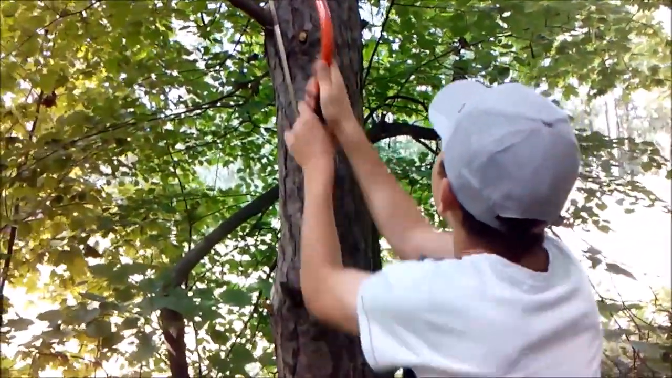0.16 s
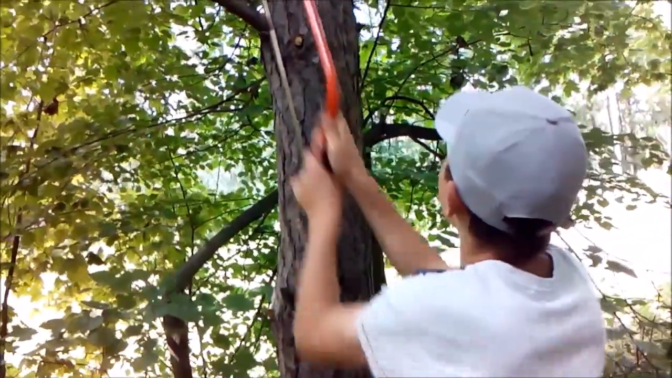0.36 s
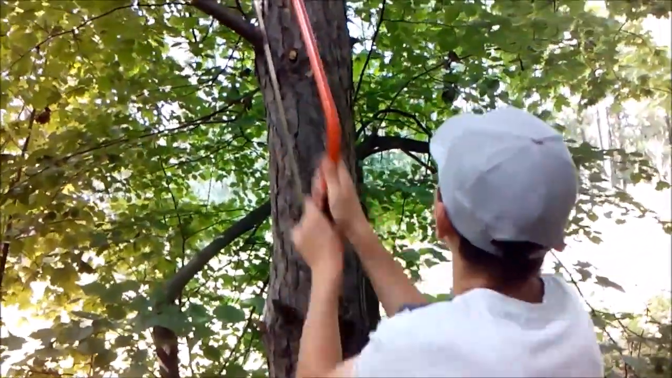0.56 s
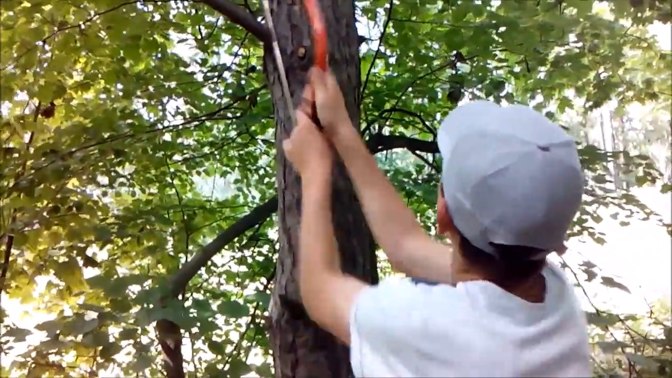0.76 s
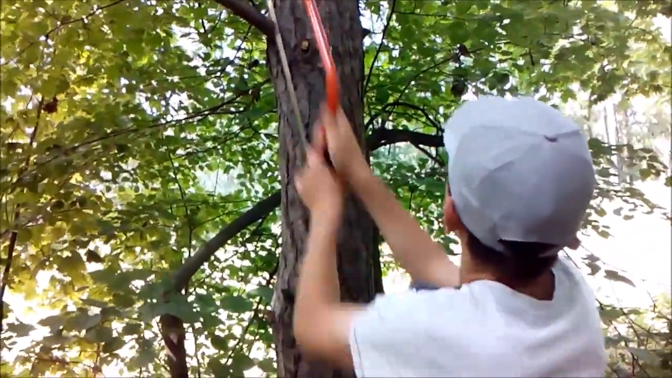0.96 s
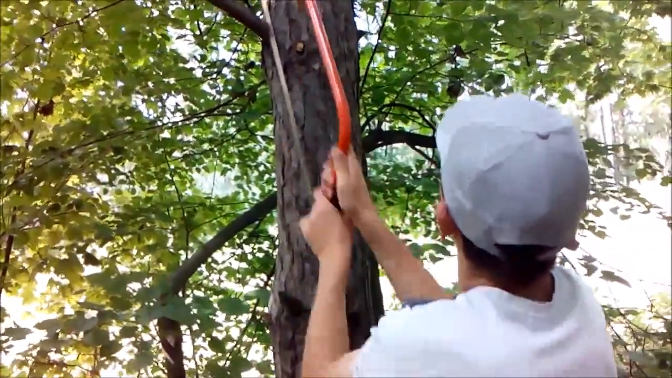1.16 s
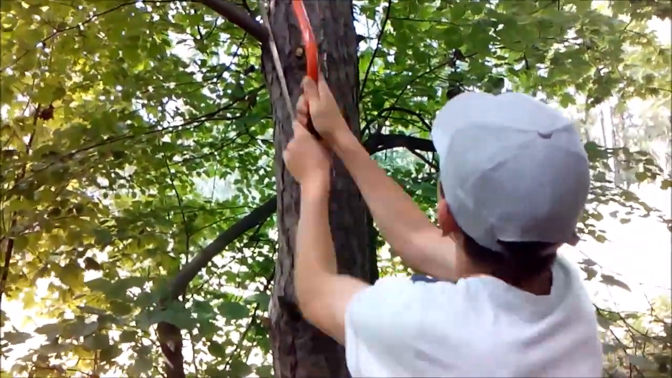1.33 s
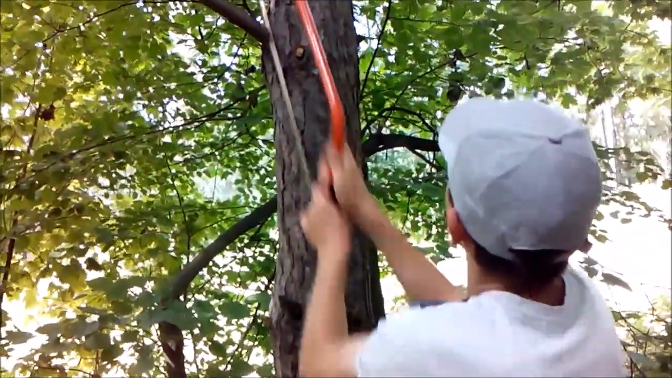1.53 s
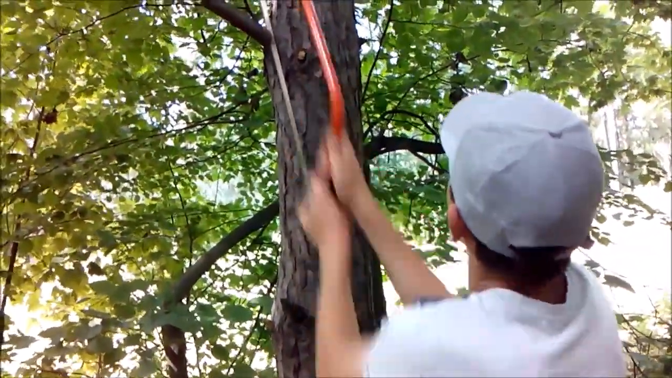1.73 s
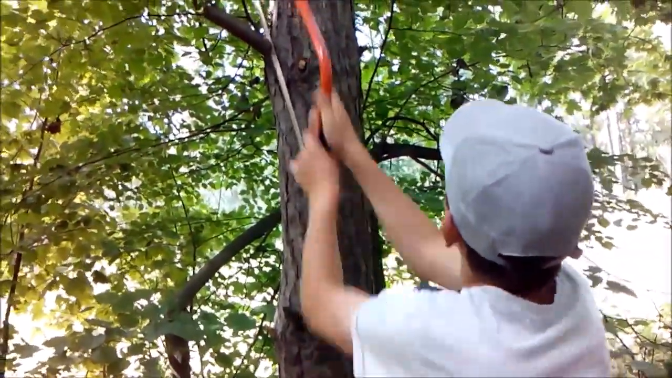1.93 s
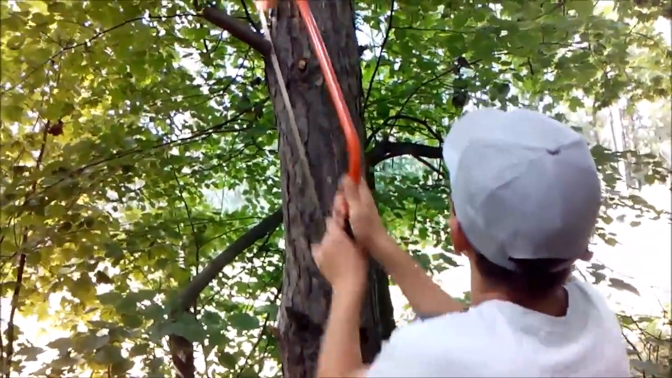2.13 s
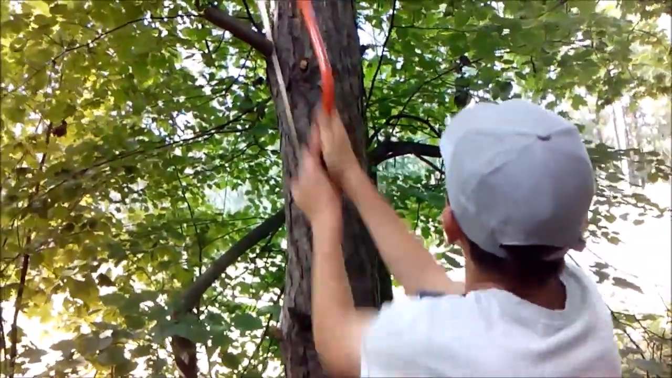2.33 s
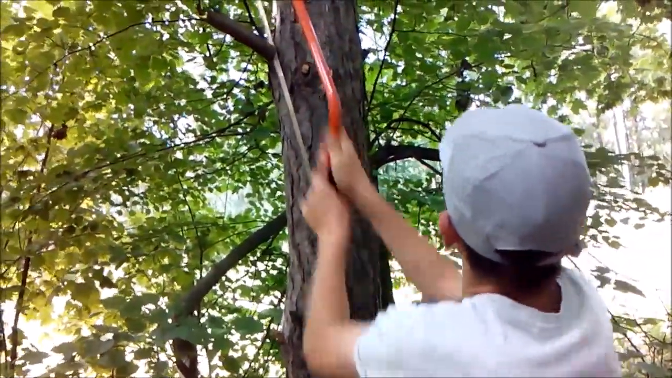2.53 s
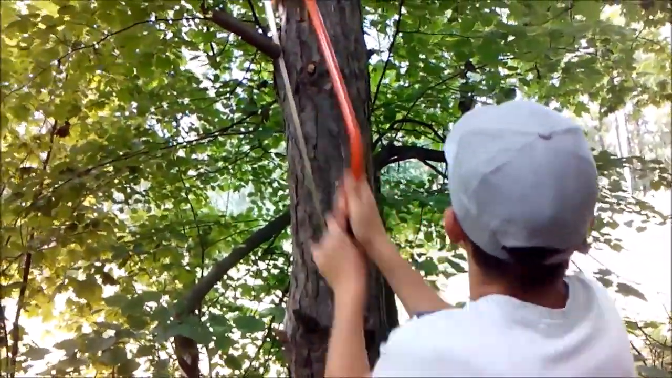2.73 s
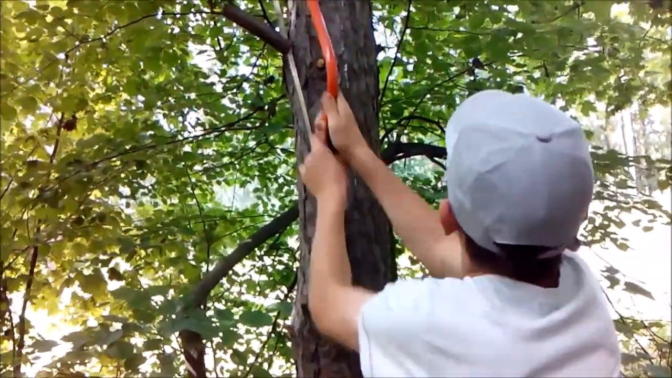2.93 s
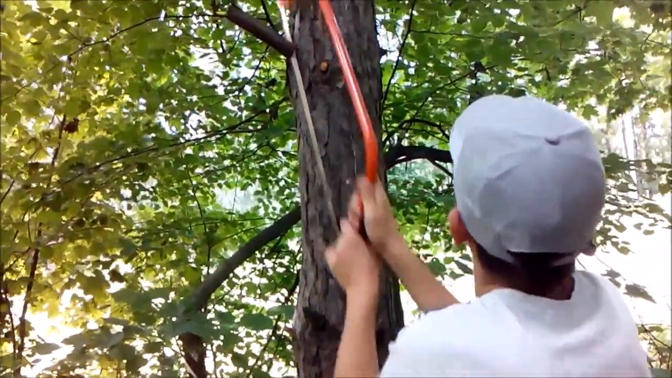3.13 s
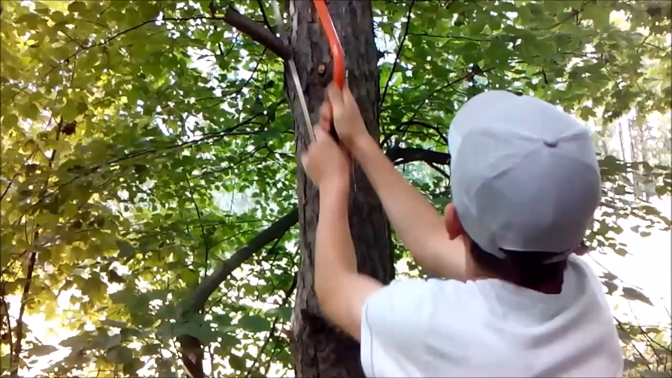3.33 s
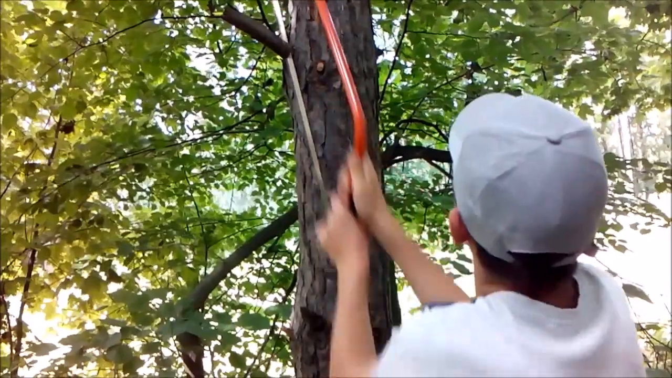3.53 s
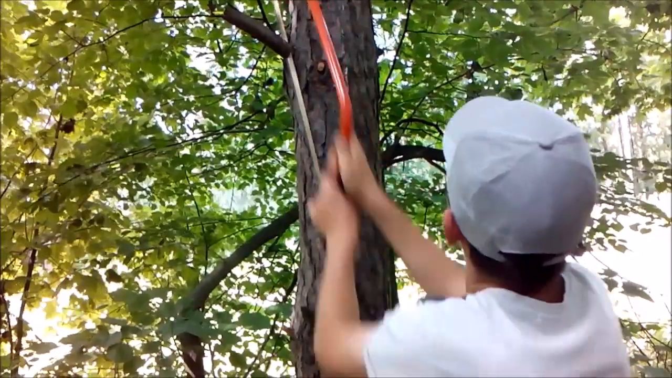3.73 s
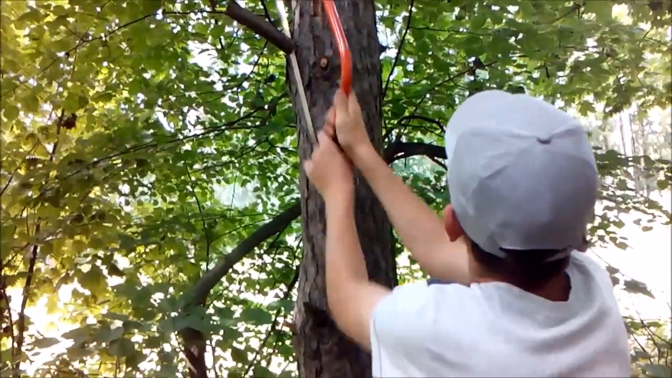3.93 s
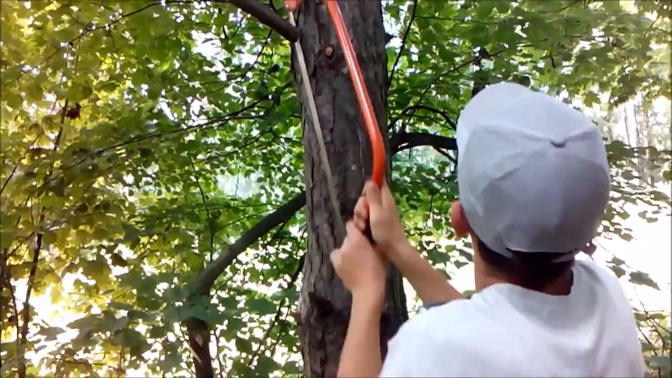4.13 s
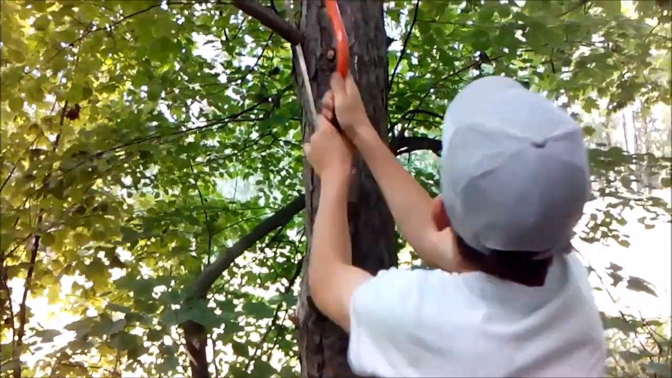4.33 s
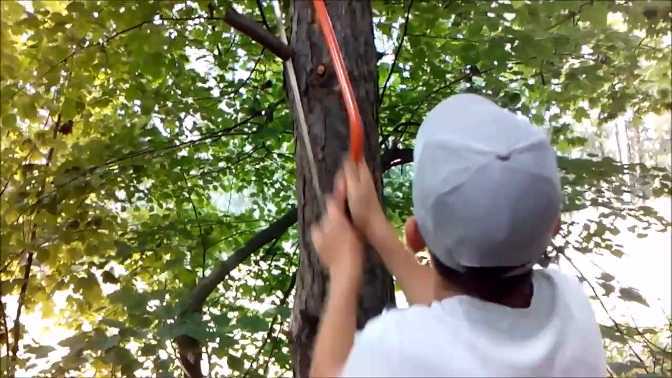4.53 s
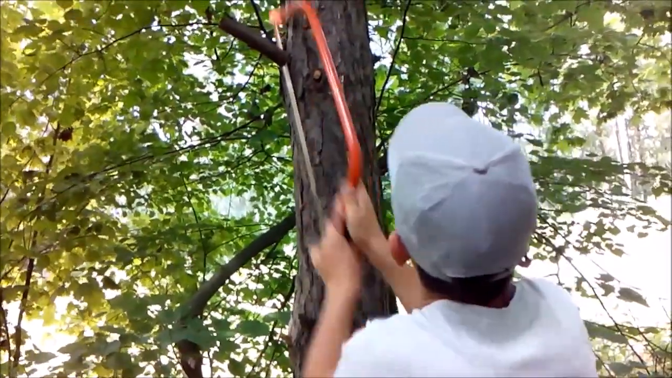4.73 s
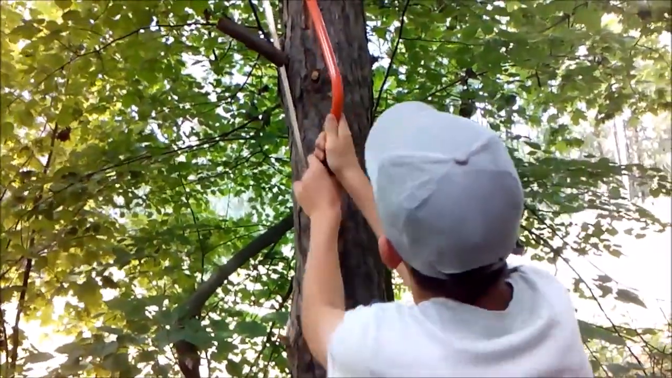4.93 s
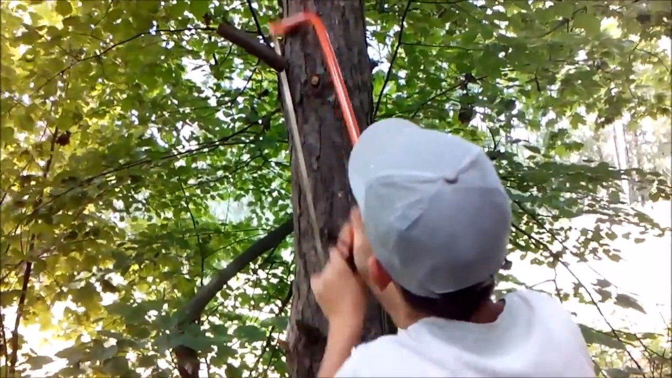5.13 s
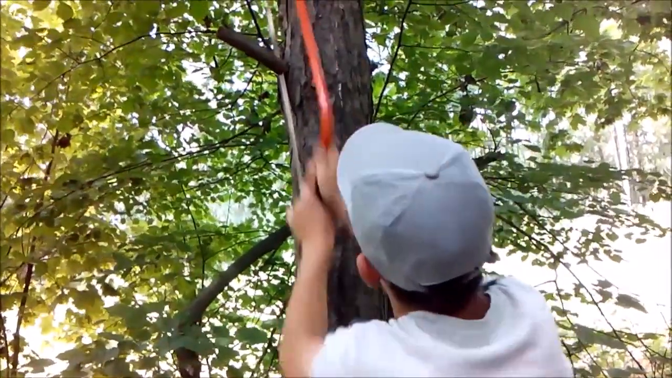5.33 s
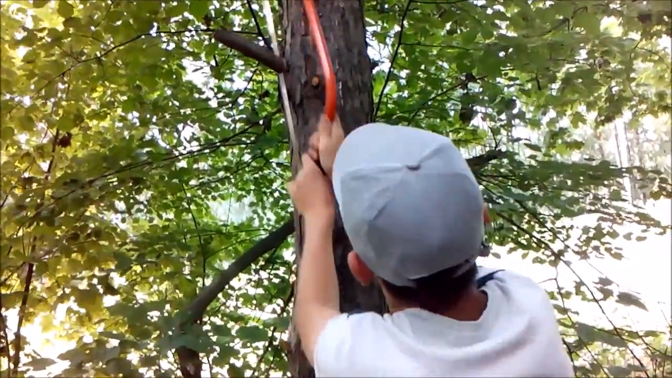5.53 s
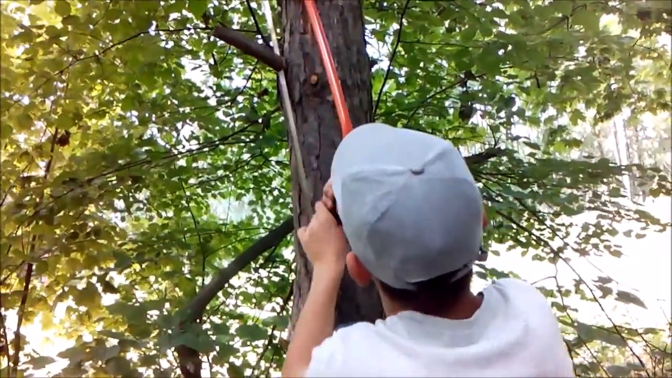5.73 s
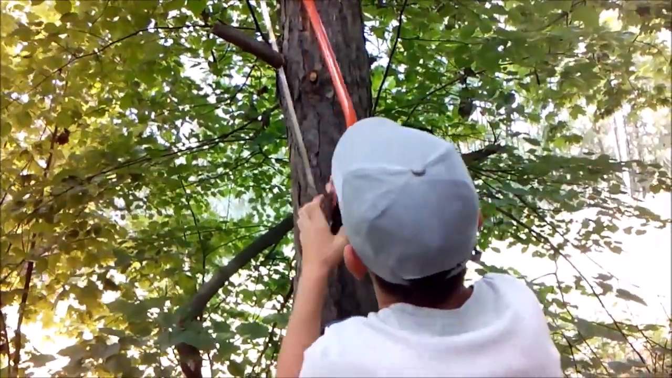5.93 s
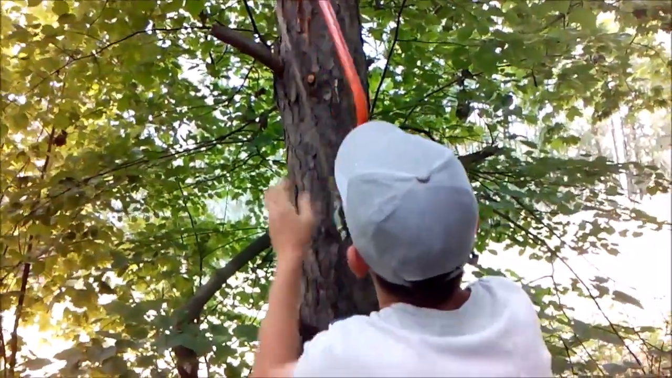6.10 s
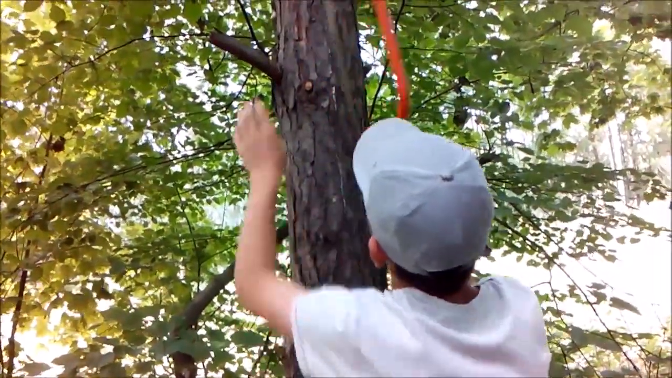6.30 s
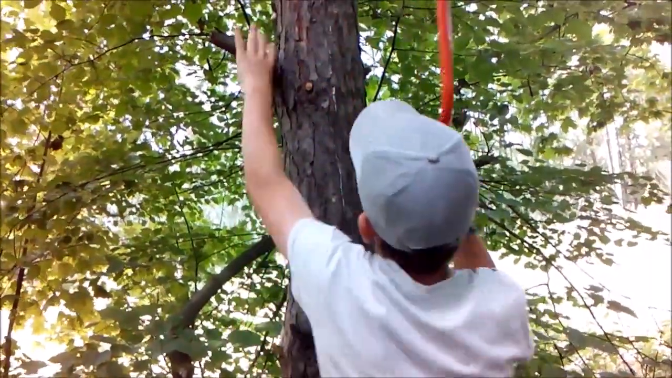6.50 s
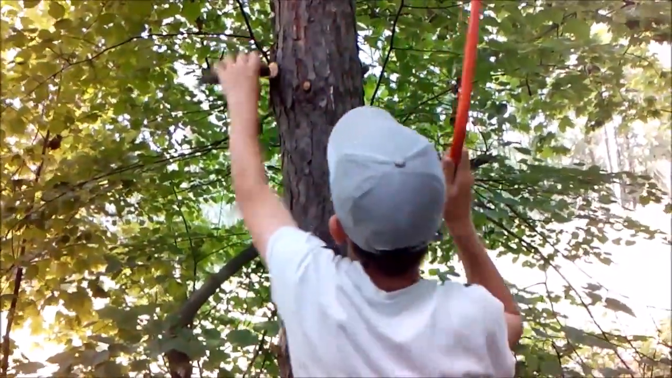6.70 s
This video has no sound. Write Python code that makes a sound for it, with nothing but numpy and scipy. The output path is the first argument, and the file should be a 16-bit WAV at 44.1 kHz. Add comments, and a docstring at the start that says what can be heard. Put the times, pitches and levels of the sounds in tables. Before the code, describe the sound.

Rapid raspy sawing, bright steel teeth tearing dry fibres, with louder pulls and lighter pushes. Teeth catch and burst free; the stub hums and groans low. The pace eases to long, separate, hollow strokes with very faint return pushes, then the saw comes away and a hand brushes bark with crisp scuffs and little knocks. Heard close, in open woodland with faint scattered echoes and a very quiet leafy background.

```python
"""In a quiet wood, over a steady hiss of leaves and a rumble, a bow saw cuts a dry branch stub off a tree.
Quick strokes slow and lighten: noisy tooth strikes excite the resonances of steel, fibres and hollow wood.
The stub drones on the pull, caught teeth burst free, the pinched blade sings, and the sagging stub groans.
Dry ticks join during the cut; then the saw is lifted away, and bark and twigs, grains of noise, rustle
and tick under a hand. Scattered echoes from ground and trees follow every near sound."""
import sys
import numpy as np
from scipy import signal
from scipy.fft import rfft, irfft
from scipy.io import wavfile
from scipy.ndimage import uniform_filter1d

SR = 44100
rng = np.random.default_rng(int(sys.argv[2]) if len(sys.argv) > 2 else 0)


def wav_record(signal):
    """Record a signal, one row per channel, as 16-bit PCM in the file named by sys.argv[1]."""
    frames = np.transpose(np.atleast_2d(signal))
    bounded = np.clip(frames, -1, 1)
    # unit amplitude maps onto the largest positive 16-bit level
    quanta = np.round(bounded * 32767).astype(np.int16)
    wavfile.write(sys.argv[1], SR, quanta)


N = 302512
TIME = np.arange(N) / SR  # s


def gain_of(db):
    """Level law: decibels to amplitude ratio."""
    return 10 ** (np.asarray(db) / 20)


def evened(x):
    """Normalisation: scales to rms 1."""
    return x / np.sqrt(np.mean(x ** 2) + 1e-20)


def add(mix, s, sound):
    """Superposition: adds a sound to the mix from time s in seconds."""
    part = mix[round(s * SR):][:len(sound)]
    part += sound[:len(part)]


def curve(points):
    """Linear interpolation over time through (seconds, value) points."""
    return np.interp(TIME, *np.transpose(points))


def coloured(x, points):
    """Spectral shaping: filters by (Hz, dB) points joined along log frequency."""
    hz, db = np.transpose(points)
    bins_hz = np.fft.rfftfreq(len(x), 1 / SR)
    response_db = np.interp(np.log(bins_hz + 1), np.log(hz), db)
    return irfft(rfft(x) * gain_of(response_db), len(x))


def wander(rate_hz):
    """Low-passed random process: smooth chance of about rms 1, mostly slower than the given rate."""
    coarse = TIME[::32]
    keep = np.exp(-(np.fft.rfftfreq(len(coarse), coarse[1]) / rate_hz) ** 2)
    noise = rng.standard_normal(len(coarse))
    return np.interp(TIME, coarse, evened(irfft(rfft(noise) * keep, len(coarse))))


def resonate(x, hz, width):
    """Resonance: a double pole of peak gain 1 that follows the curve hz, 6 dB down at hz +- width."""
    turn = np.exp(2j * np.pi * np.cumsum(hz * np.ones(len(x))) / SR)
    r = np.exp(-2 * np.pi * width / SR)
    # shift the resonance to 0 Hz, low-pass there and shift back
    slow = signal.lfilter([(1 - r) ** 2], [1, -2 * r, r * r], x / turn + 1e-18)
    return 2 * (turn * slow).real


def ring(x, modes, shift_hz=0, coupling_db=0, drift=0):
    """Modal synthesis: modes shift together, and each swells and drifts as the contact passes its nodes."""
    out = 0
    for hz, width, db in modes:
        level = gain_of(db + coupling_db * np.tanh(wander(12.0)))
        pitch_hz = (hz + shift_hz) * (1 + drift * wander(11.5))
        out = out + level * resonate(x, pitch_hz, width)
    return evened(out)


def dappled(x, depth_db=6.0, size=1024):
    """Dense modal field: narrow bands swell and fade for a few hundredths of a second."""
    overlap = size * 3 // 4
    z = signal.stft(x, nperseg=size, noverlap=overlap)[2]
    field = uniform_filter1d(rng.standard_normal(z.shape), size=2, axis=0)
    field = evened(uniform_filter1d(field, size=7, axis=1))
    shaped = z * gain_of(depth_db * np.minimum(field, 2))
    return evened(signal.istft(shaped, nperseg=size, noverlap=overlap)[1][:N])


# Spectrum of the air in the wood. Each row: frequency in Hz, relative level in dB.
AIR_SPECTRUM = [(20, -23), (50, -13.5), (100, -2.5), (160, -8), (300, -16), (700, -21), (1050, -17),
                (3000, -18.5), (5400, -15.5), (6500, -22.5), (8200, -42), (15000, -41.5)]
AIR_DB = -71.5  # rms


def forest():
    """Stationary shaped noise: a soft hiss of leaves over a distant rumble."""
    return gain_of(AIR_DB + 0.5 * wander(7.5)) * evened(coloured(rng.standard_normal(N), AIR_SPECTRUM))


def trunks(x, t60, wet_db):
    """Diffuse scattering: faint, sparse, decaying echoes from the ground and the trees."""
    t = np.arange(SR // 3) / SR
    sparse = rng.random(len(t)) < 1500 / SR  # 1500 echoes a second
    taps = rng.standard_normal(len(t)) * sparse * (t > .008) * gain_of(-60 * t / t60)
    return x + gain_of(wet_db) * signal.fftconvolve(x, taps / np.linalg.norm(taps))[:N]


# Spectrum of snapping bark and twigs. Each row: frequency in Hz, relative level in dB.
BARK_SPECTRUM = [(40, -51), (120, -29), (240, -4), (550, -13.5), (820, -3), (1200, -9), (1700, -5.5),
                 (3000, -2), (4300, 3), (5500, 6), (6600, -4.5), (7700, -28), (10000, -47)]
# Hand and blade brush over bark and twigs. Each row: middle in seconds,
# length between the 1/e points in seconds, level at the middle in dB.
SCUFFS = [(5.785, 0.061, -75), (6.127, .11, -71), (6.328, 0.092, -52), (6.49, .08, -66.5),
          (6.731, 0.062, -54), (6.84, 0.14, -66)]
# the quiet rustle of moving about as the saw comes free
RUSTLE_FROM_S, RUSTLE_DB = 5.85, -75


def rubbing(grain_db=2.0, patchy_db=2.0):
    """Granular friction: tiny flakes of bark snap in clumps under hand and blade; scuffs swell and fade."""
    sizes = gain_of(grain_db * np.minimum(rng.exponential(1, N), 5))
    grains = rng.standard_normal(N) * sizes * (rng.random(N) < 6000 / SR)  # 6000 a second
    flakes = dappled(coloured(grains, BARK_SPECTRUM), depth_db=3.0)
    flakes = evened(gain_of(patchy_db * wander(90)) * flakes)
    scuffs = sum(gain_of(db) * np.exp(-(2 * (TIME - s) / length) ** 2) for s, length, db in SCUFFS)
    rustle = gain_of(RUSTLE_DB) * np.clip((TIME - RUSTLE_FROM_S) / 0.17, 0, 1)
    return (scuffs + rustle) * flakes


# Dry ticks and knocks of wood and twigs. Each row: start in seconds, peak level in dB, pitch in Hz.
TICKS = [(2.847, -35.5, 3200), (3.187, -43.5, 598), (3.626, -51, 4770), (3.856, -52, 5783),
         (4.899, -60, 5600), (5.761, -58, 5770), (6.467, -48, 5400), (6.591, -52.5, 4760),
         (6.693, -50, 4060), (6.738, -45, 890), (6.82, -49, 5300), (6.8351, -41.5, 4130),
         (6.835, -46.5, 382)]


def ticks(t60=0.0099):
    """Impulsive excitation: a brief crack of dry wood with one strong resonance."""
    out, t, lead = np.zeros(N), np.arange(2048) / SR, 256
    for s, db, hz in TICKS:
        decay = gain_of(-60 * t / t60) + 0.049 * np.exp(-t / 0.0043)
        crack = rng.standard_normal(len(t)) * decay
        tick = np.pad(crack + 3.5 * resonate(crack, hz, 400), lead)
        tick = coloured(tick, BARK_SPECTRUM)
        tick = coloured(tick, [(3 * hz, 0), (9 * hz, -14)])  # low knocks are also duller
        add(out, s - lead / SR, gain_of(db) * tick / abs(tick).max())
    return out


# The sagging stub shudders, mostly as a pull ends, and once during a push.
# Each row: middle in seconds, rms level in dB, pitch at the middle in Hz.
SHUDDERS = [(1.255, -61, 155), (1.347, -67.5, 127), (1.559, -70, 130), (1.838, -67, 141),
            (2.19, -57.5, 273), (2.489, -59.5, 299), (3.17, -65, 147), (4.529, -70, 136.6),
            (5.055, -60.5, 156.4), (5.611, -61.5, 150.4)]


def shudders(length=0.1):
    """Falling resonance: a low, rough groan of wood that drops in pitch as the blade slows."""
    out, u = np.zeros(N), np.linspace(-1, 1, int(length * SR))
    sag = 1 - .15 * u
    for s, db, hz in SHUDDERS:
        groan = resonate(rng.standard_normal(len(u)), hz * sag, 49) * np.cos(np.pi * u / 2)
        add(out, s - length / 2, gain_of(db) * evened(groan))
    return out


# Modes of the blade held in the cut.
# Each row: frequency in Hz, half-width at -6 dB in Hz, relative level in dB.
BLADE_MODES = [(1565, 151, 2), (1887, 117, 2), (2040, 57, -1), (2260, 94, 2), (2492, 112, 3.5),
               (3029, 82, 2.5), (3318, 93, 0.5), (3755, 48, -0.5), (4544, 117, 1), (4804, 60, 1.5),
               (5264, 102, 3), (5515, 96, -0.5), (5910, 110, -0.5), (6410, 91, -12.5)]
# Spectrum of tearing fibres. Each row: frequency in Hz, relative level in dB.
TEAR_SPECTRUM = [(300, -25), (1200, -16), (1550, -0.5), (3300, 6.5), (4000, 3), (5400, 3), (6200, -2),
                 (7000, -11), (7700, -22.5), (8500, -34.5), (13000, -51.5), (16000, -67)]
# A tooth catches and breaks free. Each row: release in seconds,
# starting rms level in dB before a last treble cut, 60 dB decay time in seconds.
SNAGS = [(0.253, -40.5, 0.26), (0.407, -36.5, 0.084), (0.575, -39, 0.044), (0.6688, -39, 0.024),
         (0.704, -40, 0.03), (1.024, -30.5, 0.032), (1.142, -38.5, 0.047), (1.168, -34.5, 0.035),
         (1.6153, -40.5, 0.08), (1.915, -40.5, 0.07), (2.103, -40.5, 0.14), (2.333, -54, 0.031),
         (2.913, -49.5, 0.11), (3.582, -54, 0.04)]
HOLD_S, HOLD_DB = 0.012, -4  # before a snag the caught tooth holds the blade back


def snags():
    """Stick-slip release: a caught tooth lets go with a short, harsh burst in blade and fibres."""
    bursts, t = np.zeros(N), np.arange(SR // 8) / SR
    for s, db, t60 in SNAGS:
        add(bursts, s, gain_of(db - 60 * t / t60))
    jolt = rng.standard_normal(N)
    harsh = evened(ring(jolt, BLADE_MODES) + evened(coloured(jolt, TEAR_SPECTRUM)))
    return coloured(bursts * harsh, [(6500, 0), (8500, -25)])


def held_back():
    """Stick phase: the gain sinks as a tooth catches, and returns when it lets go."""
    db = sum(HOLD_DB * np.exp(-abs(s - TIME) / HOLD_S) * (TIME < s) for s, _, _ in SNAGS)
    return gain_of(uniform_filter1d(db, size=60))


# Cycles of the arm. Each row: pull start in seconds, push start in seconds, nominal pull rasp in dB,
# nominal push rasp in dB, stub drone on the pull in dB re rasp.
CYCLES = [(-0.113, 0.025, -37.5, -42, -9), (0.211, 0.379, -36, -41, -12), (0.519, 0.683, -37, -40.5, -10),
          (0.814, 0.981, -36.5, -39.5, -16), (1.112, 1.274, -37.5, -41, -15),
          (1.406, 1.583, -40, -46, -18.5), (1.721, 1.89, -42, -45, -12), (2.019, 2.213, -42.5, -46.5, -11),
          (2.34, 2.519, -43.5, -47.5, -11.7), (2.666, 2.841, -46, -50.2, -8),
          (2.997, 3.187, -49.5, -55, -13.5), (3.401, 3.59, -46, -55, -6),
          (3.859, 4.068, -44.5, -54.5, -9.5), (4.367, 4.582, -45.5, -56, -26.5),
          (4.875, 5.118, -48, -60.5, -10.4), (5.414, 5.682, -45, -69.5, -9)]
LAST_STROKE_ENDS = 5.915  # s
# share of a stroke gone when the blade is fastest; a slow push takes longer to gather speed
PULL_FASTEST, PUSH_FASTEST, PUSH_LAG_PER_S = .566, .485, .59
PUSH_DRONE_DB = -23  # re rasp: on the push the teeth skate and hardly shake the stub


def arm():
    """Reciprocating motion, pull and push in turn.

    Returns blade position -1..1, speed 0..1, strokes a second, pushing 0..1, rasp dB, drone dB."""
    cycles = np.array(CYCLES)
    turns = np.append(cycles[:, :2], LAST_STROKE_ENDS)
    length = np.diff(turns)
    push = np.arange(len(length)) % 2
    share = np.where(push, PUSH_FASTEST + PUSH_LAG_PER_S * length, PULL_FASTEST)
    fastest = turns[:-1] + length * np.clip(share, 0, 1)
    marks = np.sort(np.append(turns, fastest))
    phase = np.interp(TIME, marks, np.arange(len(marks)) / 2)  # one per stroke
    stroke = np.minimum(phase.astype(int), len(length) - 1)
    drone_db = np.where(push, PUSH_DRONE_DB, np.repeat(cycles[:, 4], 2))
    per_stroke = (1 / length, push, cycles[:, 2:4].ravel(), drone_db)
    held = [uniform_filter1d(c[stroke].astype(float), size=600) for c in per_stroke]
    return np.cos(np.pi * phase), abs(np.sin(np.pi * phase)), *held


def teeth(rate_hz, jitter, uneven_db, tear_share):
    """Periodic impact with noise: each tooth strikes the cut, then drags a short crackle of torn fibres."""
    passed = np.cumsum(rate_hz * np.exp(jitter * wander(120))) / SR
    tooth = passed.astype(int)
    size = gain_of(uneven_db * np.clip(rng.standard_normal(N), -2, 2))[tooth]
    strikes = np.diff(tooth, prepend=0) / np.sqrt(rate_hz)
    fibres = (.3 + np.exp(-(passed % 1) / .45)) * rng.standard_normal(N)
    share = np.clip(tear_share, 0, 1)
    return evened(size * (np.sqrt(1 - share) * evened(strikes) + np.sqrt(share) * evened(fibres)))


# Bending modes of the stub and the saw frame.
# Each row: frequency in Hz, half-width at -6 dB in Hz, relative level in dB.
STUB_MODES = [(131.3, 9.9, -27), (232.3, 24, -5), (304.3, 24.4, -14), (407.5, 44.5, -17)]


def stub_drone(drive):
    """Forced bending vibration: the heavy stub is shaken by the crumbling wood."""
    stub = ring(drive + 2 * rng.standard_normal(N), STUB_MODES, coupling_db=3.5, drift=0.025)
    # the rubbing blade damps wide swings, which steadies the drone
    return evened(stub / np.sqrt(0.81 + uniform_filter1d(stub ** 2, size=1500)))


# Higher, hollow modes of the wood.
# Each row: frequency in Hz, half-width at -6 dB in Hz, relative level in dB.
HOLLOW_MODES = [(515, 57, -1.5), (651.5, 22.3, 1.5), (839, 73, 0.5), (971, 79, 0.5), (1155, 23, 1)]
# level in a stroke of FIRM_DB (dB re rasp); it stands out more as the strokes lighten (dB per dB)
FIRM_DB, PULL_HOLLOW_DB, PUSH_HOLLOW_DB, HOLLOW_GROWTH = -40, -15.5, -21.5, 0.4


def hollow_wood(drive, pushing, rasp_db):
    """Body resonance: the wood answers the teeth with a hollow tone."""
    db = np.interp(pushing, [0, 1], [PULL_HOLLOW_DB, PUSH_HOLLOW_DB])
    db = db + HOLLOW_GROWTH * (FIRM_DB - rasp_db)
    return gain_of(db) * ring(drive, HOLLOW_MODES, coupling_db=8.5, drift=0.034)


# Free, taut length of the blade.
# Each row: frequency in Hz, half-width at -6 dB in Hz, nominal level in dB re rasp.
TWANG_MODES = [(6280, 7.8, -26), (6384, 11, -27.5)]


def twang(drive, force):
    """Free decay: lightly damped high modes of the blade, fed by the strokes, ring on between them."""
    out = 0
    for hz, width, db in TWANG_MODES:
        out = out + gain_of(db) * resonate(force * drive, hz, width) / resonate(drive, hz, width).std()
    return out


# The cut pinches the blade. Each row: time in seconds, grip from 0 to 1.
PINCH_GRIP = [(1.3, 0.17), (2.1, 0.49), (2.6, 0.87), (2.95, 0.72), (3.25, 0.03)]
PINCH_HZ, PINCH_DB = 1139, -9  # level re rasp at full grip


def pinched_blade(drive, grip):
    """Clamped resonance: the gripped blade sings near one pitch."""
    pitch_hz = PINCH_HZ * (1 + .012 * wander(10))
    return gain_of(PINCH_DB) * grip * evened(resonate(drive, pitch_hz, 35))


# The blade binds as it sinks into the wood, which shifts all its modes.
# Each row: time in seconds, shift in Hz.
BINDING_SHIFT = [(1.0, 3), (3.3, -19), (4.0, 56.5), (5.7, 56)]
# share of the rasp that is torn fibres: per stroke a second, and added by the skating push
TORN_PER_PACE, PUSH_TORN = 0.088, 0.21
BRIGHT_DB, PINCH_DULLS_DB = 1.5, 3  # treble lift before levelling, and its loss at full grip


def rasp_of(drive, position, pace, pushing, grip):
    """Shared excitation: the same teeth ring the steel blade and tear the fibres."""
    # the free length of the blade changes as it slides, and its modes glide with it
    shift_hz = curve(BINDING_SHIFT) + 20 * position
    steel = ring(drive, BLADE_MODES, shift_hz, coupling_db=8.0, drift=0.014)
    tearing = dappled(coloured(drive, TEAR_SPECTRUM), depth_db=4.5)
    # quick strokes tear more fibres; slow ones let the steel ring clearly
    torn = np.clip(TORN_PER_PACE * pace + PUSH_TORN * pushing, 0, .95)
    rasp = np.sqrt(1 - torn) * steel + np.sqrt(torn) * tearing
    treble = coloured(rasp, [(3600, -49), (4200, 5.5)])
    lift = gain_of(BRIGHT_DB - PINCH_DULLS_DB * grip + 1.0 * wander(12))
    return (rasp + (lift - 1) * treble) / np.sqrt(0.53 * (1 + lift ** 2))


# loudness goes as a power of speed, given for a stroke of BRISK_S; longer strokes bite only in their middle
BRISK_S, PULL_POWER, PUSH_POWER, POWER_GROWTH = .15, 1.79, 1.32, 0.86
# the stub drones only in the heart of a stroke (power re the rasp's), and late (share of the stroke)
DRONE_POWER, DRONE_LAG = 1.08, 0.071


def saw():
    """Source and resonators: the teeth drive blade and wood, louder and faster in mid-stroke."""
    position, speed, pace, pushing, rasp_db, drone_db = arm()
    grip = np.clip(curve(PINCH_GRIP), 0, 1)
    drive = teeth(50 * pace * (.3 + .7 * speed), jitter=.06, uneven_db=1.0, tear_share=0.89)
    sawing = np.clip((LAST_STROKE_ENDS - TIME) / 0.03, 0, 1)
    # the bite is uneven as the teeth meet hard and soft grain
    bite = gain_of(1.1 * wander(50))
    effort = gain_of(rasp_db) * bite
    power = np.interp(pushing, [0, 1], [PULL_POWER, PUSH_POWER]) / (pace * BRISK_S) ** POWER_GROWTH
    # quick strokes keep the blade ringing through the turn
    force = effort * (0.014 * pace + speed ** power) * sawing * held_back()
    rasp = rasp_of(drive, position, pace, pushing, grip)
    wood = hollow_wood(drive, pushing, rasp_db)
    pinch = pinched_blade(drive, grip)
    # the stub follows the stroke late
    swing = effort * (0.079 + speed ** (power * DRONE_POWER)) * sawing
    swing = np.interp(TIME - DRONE_LAG / pace, TIME, swing)
    drone = swing * gain_of(drone_db) * stub_drone(drive)
    return force * (rasp + wood + pinch) + twang(drive, force) + drone


def scene():
    """Superposition: everything near the tree, its echoes, and the wood around it."""
    near = saw() + shudders() + snags() + ticks() + rubbing()
    return (trunks(near, t60=.25, wet_db=-19) + forest())[None]


def record(dry):
    """Band limiting: a steep linear-phase low-pass at 15.5 kHz."""
    lowpass = signal.firwin(511, 15500, window=("kaiser", 9), fs=SR)
    return signal.oaconvolve(dry, lowpass[None], "same")


dry = scene()
out = record(dry)
wav_record(out)
```